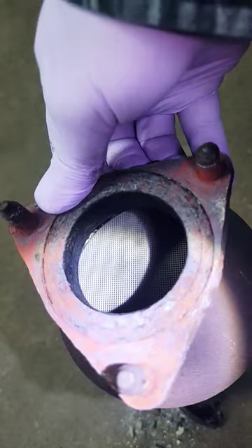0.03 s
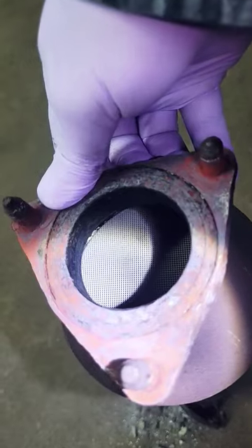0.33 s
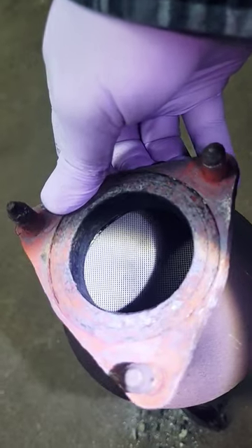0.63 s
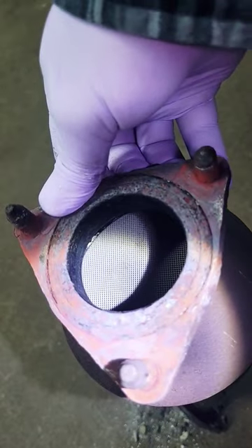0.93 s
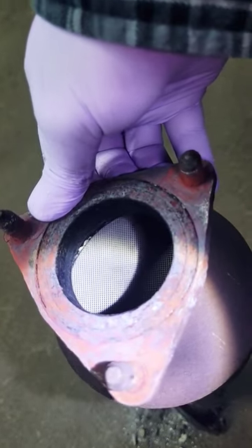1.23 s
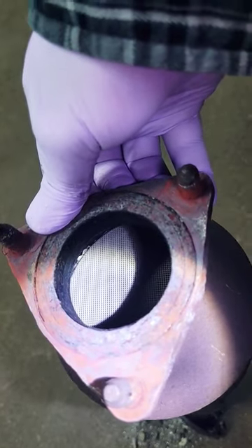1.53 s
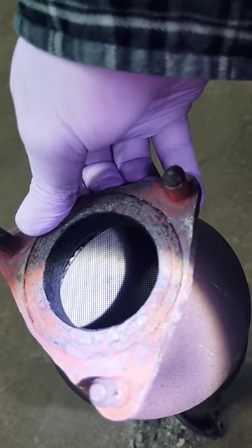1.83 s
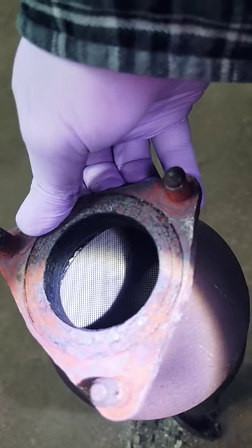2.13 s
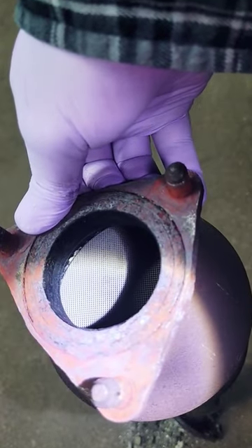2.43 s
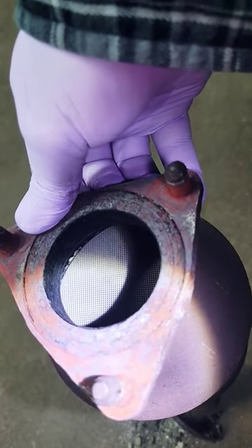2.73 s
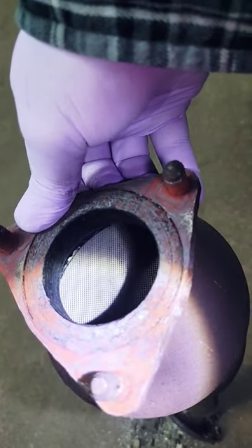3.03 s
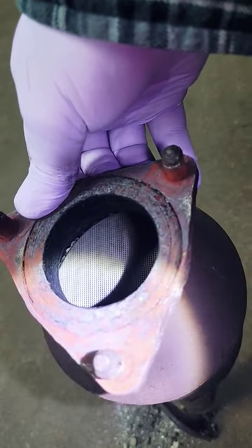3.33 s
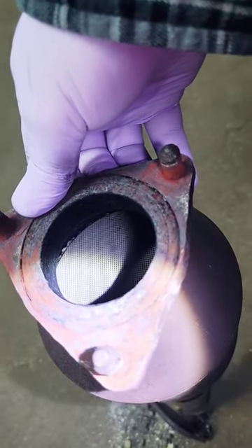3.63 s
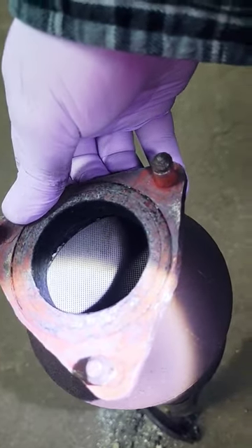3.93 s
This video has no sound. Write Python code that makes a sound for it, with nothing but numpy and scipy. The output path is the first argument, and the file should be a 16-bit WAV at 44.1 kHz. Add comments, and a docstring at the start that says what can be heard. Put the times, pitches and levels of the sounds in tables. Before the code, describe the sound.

Loose pieces rattle inside a steel exhaust part, starting with knocks and a clank at about 0.15 seconds and a brief gritty slide around 0.3. Quick ticks follow from 0.6 to 1 second, single ones near 1.35 and 2, another run from 2.4 to 2.7, and last ticks at 3 and 3.8. The hits echo, with a few soft low thuds, over a large garage's steady machine hum and rumble.

```python
"""In a large, hard-walled garage with humming machinery, an exhaust part is turned in the hand.
Loose pieces inside tick singly or tumble in short runs, making the steel shell knock and ring.
It clanks once, crumbs slide grittily over the steel, and soft low thuds and swells come and go.
The hall's echoes draw every tick out into a noisy tail, over a steady rumble and a thin hiss."""
import sys
import numpy as np
from scipy import signal
from scipy.fft import rfft, irfft
from scipy.io import wavfile
from scipy.ndimage import uniform_filter1d

SR = 44100
rng = np.random.default_rng(int(sys.argv[2]) if len(sys.argv) > 2 else 0)


def to_wav(sig):
    """Store sig (one row per channel, or 1-D mono) as 16-bit WAV at the path in sys.argv[1].

    Samples outside -1..1 are clipped; the rate is SR.
    """
    pcm = np.clip(np.atleast_2d(sig), -1, 1) * 32767
    pcm = np.round(pcm).astype(np.int16)
    wavfile.write(sys.argv[1], SR, pcm.T)  # frames by channels


N = 176400

# Bright tone colour (how strong each pitch is) of ticks and clicks: pitch_hz, level_db
TICK_COLOUR = [(200, 5), (900, -16), (1600, 3), (2200, 6), (2600, -0.5), (3200, 0), (4500, 1.5), (5800, -5),
               (7500, -0.5), (9500, -3.5), (11500, -3), (13000, -5.5), (15500, -5.5)]


def amp(db):
    """Turns decibels into a volume factor."""
    return 10 ** (np.asarray(db) / 20)


def unit(x):
    """Scales a signal to an average strength (rms) of 1."""
    return x / np.sqrt(np.mean(abs(x) ** 2) + 1e-20)


def at_pitch(points, hz):
    """Looks up a table's value at any pitch, sliding between its rows."""
    pitches, values = np.transpose(points)
    return np.interp(np.log(hz + 1), np.log(pitches), values)


def level(points):
    """Draws a volume curve through rows of time_s, level_db."""
    return amp(np.interp(np.arange(N) / SR, *np.transpose(points)))


def add(mix, start_s, sound):
    """Mixes a stereo sound in at start_s."""
    part = mix[:, max(round(start_s * SR), 0):][:, :sound.shape[1]]
    part += sound[:, :part.shape[1]]


def colour(x, points):
    """Gives two signals a tone colour and blends their lows, like sound arriving from all around."""
    # How alike left and right are: pitch_hz, likeness (0 to 1)
    likeness = [(30, .96), (60, .95), (130, .945), (260, .78), (600, .4), (1200, 0), (16000, 0)]
    spectrum, hz = rfft(x), np.fft.rfftfreq(x.shape[1], 1 / SR)
    same = at_pitch(likeness, hz)
    mid, side = spectrum[0] * np.sqrt(1 + same), spectrum[1] * np.sqrt(1 - same)
    return unit(irfft(np.array([mid + side, mid - side]) * amp(at_pitch(points, hz)), x.shape[1]))


def noise(points, size=N):
    """Stereo noise with the given tone colour."""
    return colour(rng.standard_normal((2, size)), points)


def drift(rate_hz, size=N):
    """A smooth random wobble in strength and phase; a higher rate wobbles faster."""
    spectrum = rng.standard_normal(size) + 1j * rng.standard_normal(size)
    return unit(np.fft.ifft(spectrum * np.exp(-(np.fft.fftfreq(size, 1 / SR) / rate_hz) ** 2)))


def wavering_tone(hz, db, depth, rate_hz):
    """One tone that wavers at random."""
    t = np.arange(N) / SR
    waver = unit(1 + depth * drift(rate_hz))
    tone = np.exp(2j * np.pi * (hz * t + rng.random()))
    return amp(db) * np.sqrt(2) * (waver * tone).real


def mains_hum(mains_hz=59.95):
    """Mains power hums at multiples of its own pitch, swelling and dipping."""
    # One row for each multiple: level_db, waver_depth, waver_hz
    tones = [(-53, 0.37, 4), (-43, 0.19, 13), (-55, 0.54, 3.4), (-72.5, .4, 3.5)]
    # Rise and fall of the hum: time_s, level_db
    swell = [(.13, -11.5), (.22, -6), (.3, -9.5), (.41, -4), (.5, -0.5), (.565, -11.5), (.63, 0), (.72, -2),
             (1.05, 1), (1.55, 2), (1.9, -1.5), (2.3, -4), (2.55, -1.5), (2.75, -1), (2.9, -1), (3.3, 2.5),
             (3.6, -1.5), (4, -3.5)]
    return level(swell) * sum(wavering_tone(k * mains_hz, *row) for k, row in zip((1, 2, 4, 6), tones))


def machine_drone():
    """Running machines drone in low tones that beat against the hum."""
    # Machine tones: pitch_hz, level_db, waver_depth, waver_hz
    tones = [(50.46, -54, 1.2, 3.7), (113, -57, 0.23, 3.3), (214.9, -63.5, 1.7, 4.8),
             (298.2, -65.5, 1.5, 6.6), (376, -66.5, 2.5, 8)]
    return sum(wavering_tone(*row) for row in tones)


def hall_noise(rumble_db=-47.5, hiss_db=-76.5):
    """The hall rumbles and hisses steadily, while a dull wash and a hollow note come and go."""
    # Colours of the rumble, faintly whistling air, wash and hollow note: pitch_hz, level_db
    rumble = [(15, -25.5), (30, -8.5), (42, -7.5), (57, -0.5), (75, -1.5), (105, -1.5), (135, -1.5),
              (175, -13), (215, -4.5), (260, -7), (320, -14), (400, -19), (500, -26), (700, -30),
              (1200, -31.5), (1800, -37.5), (2300, -51), (3500, -67.5), (6000, -81), (16000, -89)]
    hiss = [(500, -5), (2350, -5), (2540, 10.5), (2680, 15), (2900, 4), (3400, -.5), (4200, -1),
            (4420, 6.5), (4600, 8.5), (4850, 6), (5150, -.5), (7000, -1), (7650, 4), (8600, -.5),
            (9400, -1.5), (15500, -.5)]
    wash = [(80, -20.5), (200, 4), (340, 6.5), (480, -6.5), (620, -4), (1000, -9), (2000, -14.5),
            (4000, -29), (8000, -37), (16000, -74)]
    hollow = [(200, -39.5), (400, -2.5), (510, 1.5), (600, -6.5), (750, -8), (1000, -36), (1600, -39),
              (8000, -59)]
    # Rise and fall of the wash and the hollow note: time_s, level_db
    wash_swell = [(.13, -44.5), (.22, -53), (.36, -55), (.45, -57), (.52, -52), (.65, -65), (.8, -55),
                  (.95, -60.5), (1.06, -59.5), (1.15, -57), (1.25, -63), (1.5, -60.5), (1.75, -67),
                  (2.45, -67), (2.7, -53.5), (2.9, -63), (3.23, -60), (3.4, -65.5), (4, -76.5)]
    hollow_swell = [(.4, -82), (.52, -60), (.65, -90), (.82, -59.5), (.95, -56), (1.05, -66), (1.15, -59),
                    (1.27, -68), (1.5, -69), (1.7, -69)]
    steady = amp(rumble_db) * noise(rumble) + amp(hiss_db) * noise(hiss)
    return steady + level(wash_swell) * noise(wash) + level(hollow_swell) * noise(hollow)


def impact(points, crack_boost_db, crack_db=-16.5, crack_s=.0011, flutter_db=1.5, size=57344):
    """A brief crack, then the hall's echoes, which build up and die away sooner in the treble."""
    # Time the echoes take to fall by 60 dB: pitch_hz, fade_s
    fade_times = [(150, 1.05), (600, 1.17), (1800, 0.9), (4000, 0.93), (7500, 0.6), (11000, 0.53),
                  (15000, 0.41)]
    # Time the echoes take to build up: pitch_hz, build_s
    build_times = [(300, 0.039), (2000, 0.024), (6000, 0.0032), (14000, 0.0023)]
    hz, band_t, bands = signal.stft(noise(points, size), SR, nperseg=256)
    fade = amp(-60 * band_t / at_pitch(fade_times, hz)[:, None])
    build = 1 - 0.54 * np.exp(-band_t / at_pitch(build_times, hz)[:, None])
    tail = signal.istft(bands * fade * build, SR, nperseg=256)[1][:, :size]
    tail *= amp(flutter_db * drift(250, size).real)
    crack = noise(points, size) * np.exp(-np.arange(size) / SR / crack_s)
    return (unit(tail) + amp(crack_db + crack_boost_db) * unit(crack)) / np.sqrt(size)


def steel_ring(tones, blur_hz=10, rise_s=0.026, size=36000):
    """Struck steel rings in fading tones, each blurred by the hall."""
    t, out = np.arange(size) / SR, np.zeros((2, size))
    for hz, db, fade_s in tones:
        tone = np.exp(2j * np.pi * hz * t) * amp(db - 60 * t / fade_s)
        blur = np.array([drift(blur_hz, size), drift(blur_hz, size)])
        out += (blur * tone).real
    return out * (1 - np.exp(-t / rise_s))


def piece_ring(x, decay_s=0.009, ring_db=-3, even_hz=500, size=2048):
    """Adds the brief ring of a hard fragment, made of many close tones."""
    fade = np.exp(-np.arange(size) / SR / decay_s)
    ring = unit(rng.standard_normal((2, size)) * fade) * amp(ring_db) / np.sqrt(size)
    ring[:, 0] = 1  # lets the hit itself through
    spectrum = rfft(ring)
    broad_power = uniform_filter1d(abs(spectrum) ** 2, int(even_hz * size / SR), axis=1)
    even_ring = irfft(spectrum / np.sqrt(broad_power))[:, :size // 2]  # keeps the overall colour
    return signal.oaconvolve(x, even_ring, axes=1)[:, :N]


def loose_pieces(tick_db=-24, knock_db=-10, shell_db=-74):
    """Each loose piece hits the shell with a bright tick, a dull knock and a faint ring."""
    # The hits: start_s, tick_and_ring_boost_db, knock_boost_db, crack_boost_db
    hits = [(0.1282, -35, -3, 6), (.144, -30, 1, 18), (.179, -7, -13, -5), (.267, 0.5, 0, 4),
            (0.5608, -1, -5, 7), (.6761, -2, -10, 6.5), (0.7444, -2.5, -11.5, 8), (.798, -0.5, -21, 6),
            (0.852, -1, -16, -9), (0.9518, -2, -7.5, 8), (1.3505, 1, -21, -5), (2.028, 1, -25, -1),
            (2.3858, -0.5, -18.5, 1.5), (2.5048, 1, -20, 3), (2.5554, -2, -6.5, 0), (2.587, -3, -8.5, 8),
            (2.6235, 0, -10.5, 5), (2.691, -3, -18, 17), (3.002, 0, -15, -2), (3.761, 0.3, -19, -2)]
    # Colour of the shell's knock: pitch_hz, level_db
    knock_colour = [(80, 0), (200, 6), (310, 2.5), (480, -9.5), (650, -7.5), (1200, -16), (2100, -18),
                    (4000, -24), (7000, -52), (15000, -60)]
    # Ringing tones of the shell: pitch_hz, level_db, fade_s (time to fall 60 dB)
    shell_tones = [(1302, -3, .9), (1475, 4, 1.1), (1660, 5, 1.1), (1803, -2, .9), (1864, -2, .9),
                   (1975, 2, 1), (2003, 1, 1), (2062, 3, .9), (2084, 2, .8), (2305, -1, .7), (2362, -2, .7),
                   (3056, 2, .7), (3096, -2, .6), (4097, 0, .6), (5168, -1, .6), (5235, -3, .6)]
    ticks, shell = np.zeros((2, 2, N))
    for start_s, boost_db, knock_boost_db, crack_boost_db in hits:
        add(ticks, start_s, amp(tick_db + boost_db) * impact(TICK_COLOUR, crack_boost_db))
        add(shell, start_s, amp(knock_db + knock_boost_db) * impact(knock_colour, 0))
        add(shell, start_s, amp(shell_db + boost_db) * steel_ring(shell_tones))
    return piece_ring(ticks) + shell


def hand_clicks(decay_s=.0006, size=16384):
    """Tiny clicks close to the hand, with no echo."""
    # The clicks: start_s, level_db
    clicks = [(.1292, -49), (.1442, -39), (.1465, -47), (.301, -44), (.555, -60), (.6595, -57),
              (.7443, -49), (.7977, -49), (.952, -50), (1.345, -60), (1.482, -58), (2.557, -48),
              (2.587, -49), (2.6236, -49), (3.345, -68), (3.6307, -64), (3.7795, -50)]
    t, out = np.arange(size) / SR, np.zeros((2, N))
    for start_s, db in clicks:
        add(out, start_s, amp(db) * noise(TICK_COLOUR, size) * np.exp(-t / decay_s))
    return out


def low_thuds(rise_s=0.0053, decay_s=0.046, size=16384):
    """Soft low thuds and brief swells near the hum's 240 Hz overtone, each with a deeper boom."""
    # The thuds and swells: start_s, thud_db, boom_db
    thuds = [(.135, -19, -19), (.19, -7.5, -11), (1.32, -15, -14.5), (2.56, -17, -26), (2.64, -18, -24),
             (2.724, -22.5, -8)]
    # Colours of the thud and the boom: pitch_hz, level_db
    thud_colour = [(60, -6), (150, -30), (210, -2.5), (243, 4), (275, -5.5), (310, 5.5), (400, -31),
                   (600, -29), (2000, -47), (12000, -72)]
    boom_colour = [(25, -21), (50, 16.5), (70, 2.5), (100, -7), (200, -39), (1000, -89)]
    t, out = np.arange(size) / SR, np.zeros((2, N))
    fade = unit(np.exp(-t / decay_s) * (1 - np.exp(-t / rise_s))) / np.sqrt(size)
    for start_s, thud_db, boom_db in thuds:
        thud = amp(thud_db) * noise(thud_colour, size)
        boom = amp(boom_db) * noise(boom_colour, size)
        add(out, start_s, fade * (thud + boom))
    return out


def clank(start_s=.144, gain_db=-57):
    """The first hard knock makes the steel clank."""
    # Tones of the clank: pitch_hz, level_db, fade_s (time to fall 60 dB)
    tones = [(303, 12, 1), (1092, -3, 1.2), (1448, -1, 1), (2083, 0, .86), (2115, -4, .8), (2417, -6, .5)]
    out = np.zeros((2, N))
    add(out, start_s, amp(gain_db) * steel_ring(tones))
    return out


def gritty_slide(grains_per_s=4700, spread_db=1.5):
    """Crumbs slide over the steel as a dense stream of tiny grains."""
    # Rise and fall of the slide: time_s, level_db
    swell = [(.26, -73), (.272, -65), (.305, -55), (.34, -57.5), (.38, -60), (.42, -71.5), (.55, -75),
             (.7, -120)]
    # Colour of the grit: pitch_hz, level_db
    grit_colour = [(300, 4), (2000, 4), (4500, -2), (6000, -2), (9000, -2.5), (10300, 3.5), (11500, 0),
                   (15000, -4)]
    grains = (rng.random((2, N)) < grains_per_s / SR) * rng.choice([-1, 1], (2, N))
    strengths = amp(spread_db * np.minimum(rng.exponential(1, (2, N)), 4))
    return piece_ring(colour(grains * strengths, grit_colour) * level(swell))


def scene():
    """The rattling part over the sound of the garage."""
    garage = mains_hum() + machine_drone() + hall_noise()
    return garage + loose_pieces() + hand_clicks() + low_thuds() + clank() + gritty_slide()


def record(dry, start_s=0.1272, top_hz=15500):
    """Leans each pitch left or right, starts the sound abruptly and cuts the highest treble."""
    # Stereo balance: pitch_hz, left_minus_right_db
    balance = [(35, -8), (120, 1.4), (350, -0.8), (700, 0), (1400, -5), (2800, -1), (5000, 4), (9000, -2),
               (15000, 2)]
    lean_db = at_pitch(balance, np.fft.rfftfreq(2 * N, 1 / SR))
    mirrored = np.hstack([dry, dry[:, ::-1]])  # keeps the end from spilling into the start
    x = irfft(rfft(mirrored) * amp(np.array([lean_db, -lean_db]) / 2))[:, :N]
    x *= np.clip((np.arange(N) / SR - start_s) / .003, 0, 1)
    x *= np.minimum(np.arange(N)[::-1] / 100, 1)  # very short fade-out
    treble_cut = signal.firwin(401, top_hz, window=("kaiser", 9), fs=SR)
    return signal.oaconvolve(x, treble_cut[None], "same")


dry = scene()
out = record(dry)
to_wav(out)
```